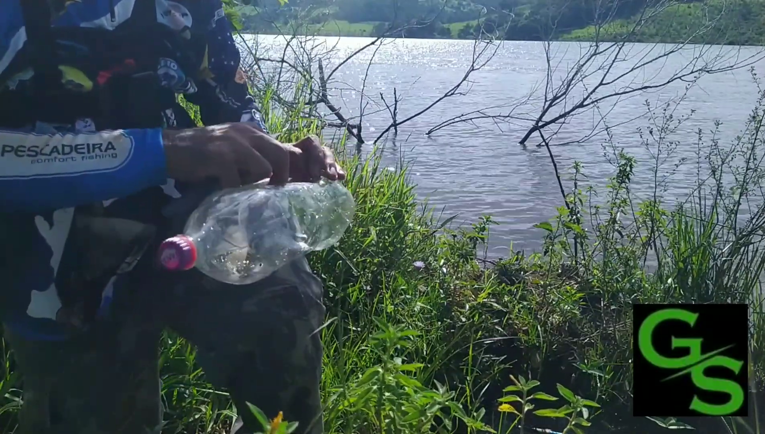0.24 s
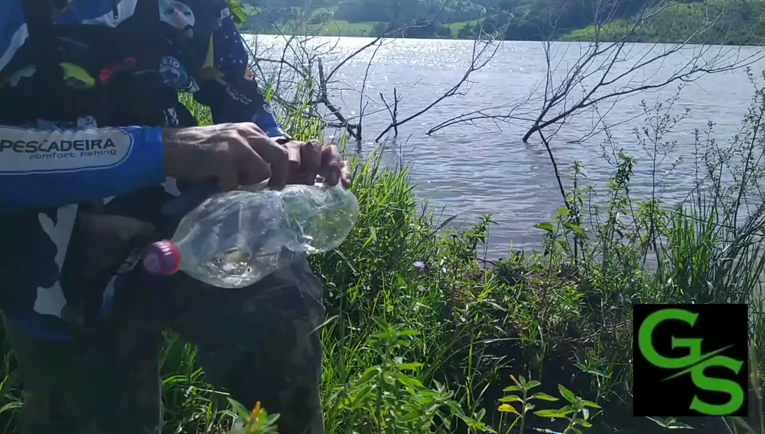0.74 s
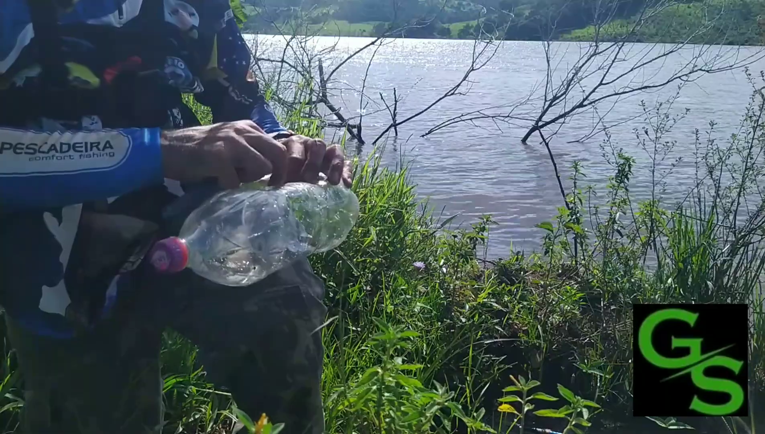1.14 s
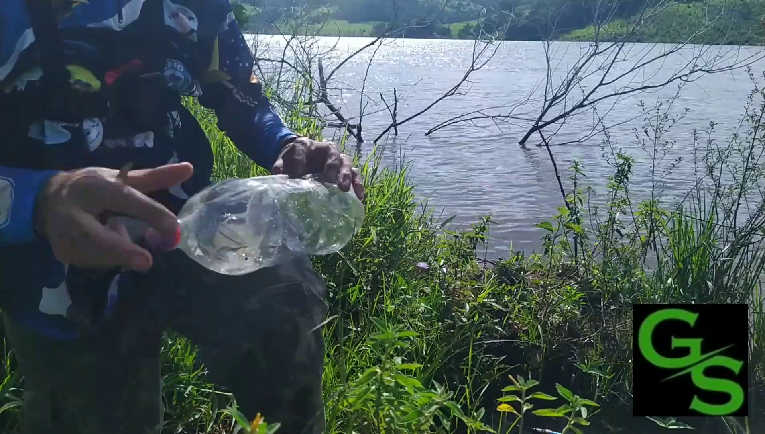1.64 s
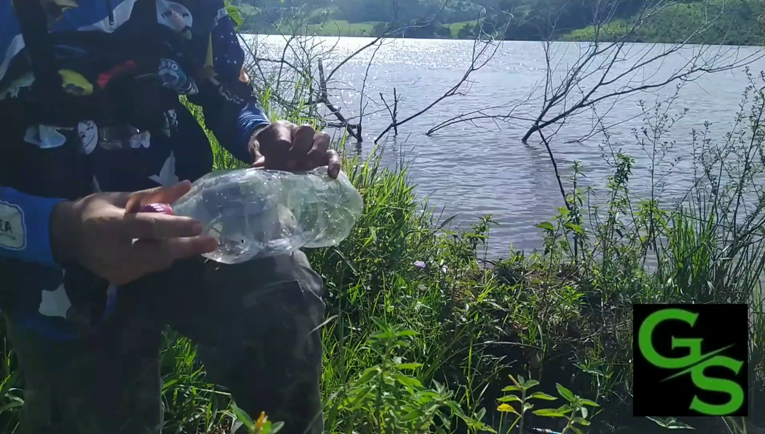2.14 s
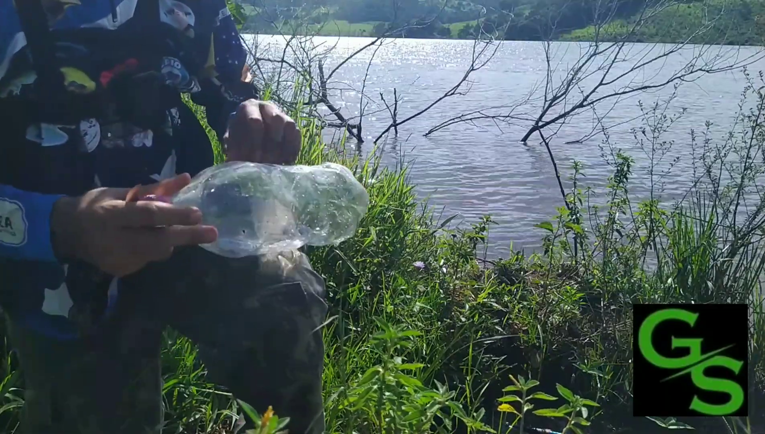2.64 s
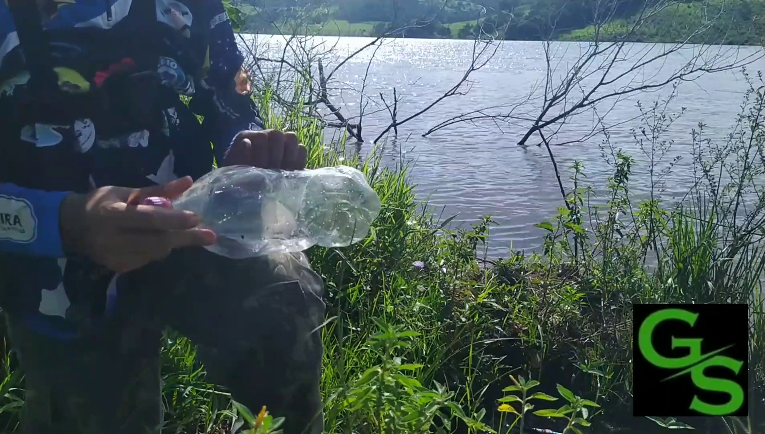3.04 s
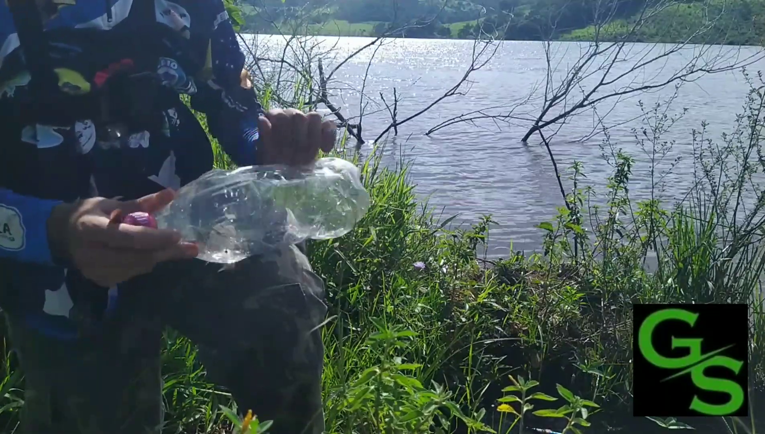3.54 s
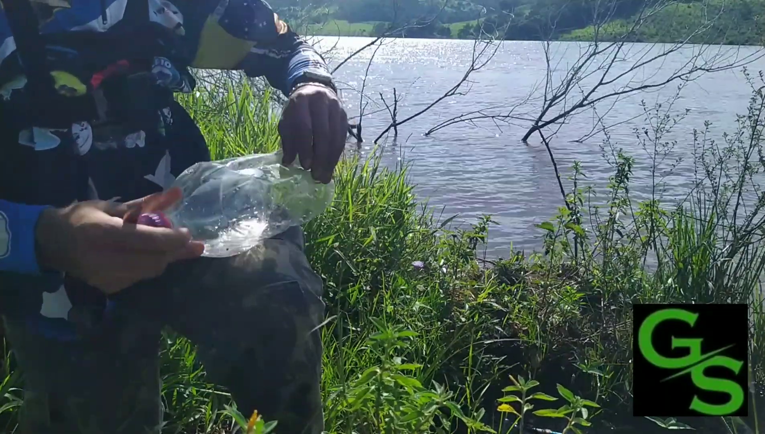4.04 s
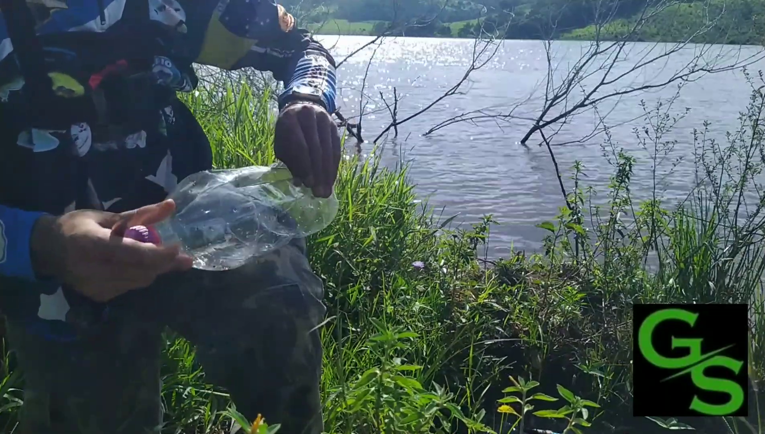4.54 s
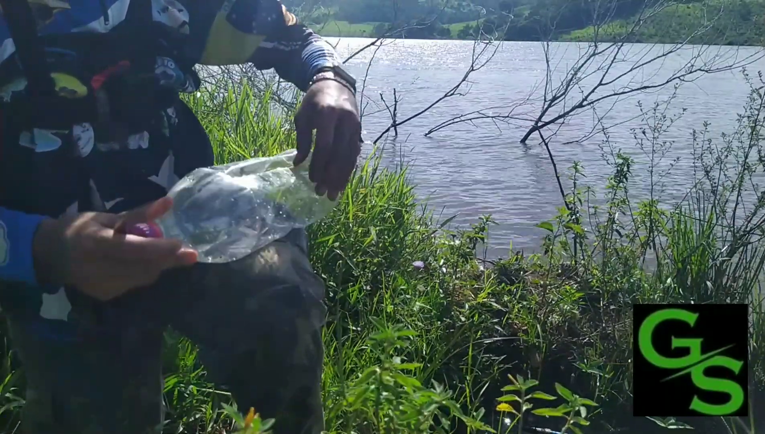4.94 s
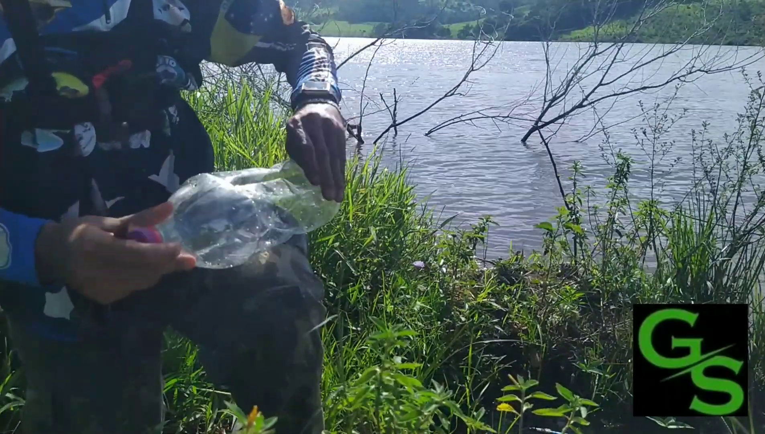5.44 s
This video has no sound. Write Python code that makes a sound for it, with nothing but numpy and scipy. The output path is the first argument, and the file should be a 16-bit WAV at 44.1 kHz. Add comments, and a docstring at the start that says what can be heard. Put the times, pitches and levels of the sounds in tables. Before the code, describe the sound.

A thin empty plastic bottle is squeezed and turned close to the microphone outdoors, very dry, in mono. Low wind rumble opens, with a heavy deep buffet at 0.2 s and a sharp plastic snap at 0.26; rumble swells again near 0.8, then fades. Weak hollow crackles and finger rubs cluster at 1.2-1.45 s, with a moderate click at 1.9. Loud short pops, each a bright crack with a hollow ring, follow as a close pair at 2.12-2.14, one at 2.72, and a tight burst at 2.97. Small creaks fill 3.2-3.65, and mild wind flutters at 3.6-4.2. A softer click at 4.26 precedes strong pops at 4.41, 4.91 and 5.34, with minor clicks between. Tiny bright ticks scatter at 5.45-5.67. Beneath are faint steady air, pulsing shrill insects around 7 kHz, and faint gliding bird whistles near 0.3 and 2.3 s.

```python
"""Beside a lake, hands squeeze and turn a thin plastic bottle; dents in its wall snap in and out.
Each snap sums damped modes of the wall and the enclosed air; sliding fingers drive the same modes with
uneven ticks, and tiny pitched ticks are short damped cycles. Wind buffets the microphone as shaped low
noise over a faint bed of air, insects shrill as narrow noise bands, and a far bird whistles gliding,
blurred sines. Weak scattered echoes surround the bottle."""
import sys
import numpy as np
from scipy import signal
from scipy.fft import rfft, irfft, next_fast_len
from scipy.io import wavfile
from scipy.ndimage import uniform_filter1d

SR = 44100
rng = np.random.default_rng(int(sys.argv[2]) if len(sys.argv) > 2 else 0)


def inscribe(sig):
    """Save sig as 16-bit PCM at rate SR to the path in sys.argv[1].

    A 1-D sig is mono; a 2-D sig holds one channel per row.
    Samples are clipped to [-1, 1] before scaling.
    """
    pcm = np.round(np.clip(np.atleast_2d(sig).T, -1, 1) * 32767)
    wavfile.write(sys.argv[1], SR, pcm.astype(np.int16))


N = 250488


def gain_of(db):
    """Level law: decibels become an amplitude ratio."""
    return 10 ** (np.asarray(db) / 20)


def evened(x):
    """Normalisation: scales a signal to rms 1."""
    return x / np.sqrt(np.mean(x ** 2) + 1e-20)


def slow_noise(shape, size):
    """Smoothing: noise averaged twice over size samples keeps only its slow variation, at rms 1."""
    noise = rng.standard_normal(shape)
    return evened(uniform_filter1d(uniform_filter1d(noise, size=size), size=size))


def read(points, hz):
    """Interpolation: a spectrum table is read on a log-frequency axis."""
    f, value = np.transpose(points)
    return np.interp(np.log(hz + 1), np.log(f + 1), value)


def coloured(x, points):
    """Linear filtering: the spectrum is multiplied by a table's gains, then brought to rms 1."""
    size = next_fast_len(len(x))
    gains = gain_of(read(points, np.fft.rfftfreq(size, 1 / SR)))
    return evened(irfft(rfft(x, size) * gains, size)[:len(x)])


def highpassed(x, order, hz):
    """High-pass filtering: a Butterworth filter removes what lies below hz."""
    return signal.sosfilt(signal.butter(order, hz, "high", fs=SR, output="sos"), x)


def add(mix, s, sound):
    """Superposition: a sound is summed into the mix from time s, cut at the end."""
    part = mix[round(s * SR):][:len(sound)]
    part += sound[:len(part)]


# Wind strength through time: time_s [s], level_db [dB]
GUST_LEVELS = [(0, -36.5), (.16, -35.5), (.27, -22.5), (.36, -38), (.42, -33.5), (.53, -56), (.62, -47.5),
               (.78, -30.5), (1.04, -59.5), (1.17, -42.5), (1.55, -59), (1.65, -46), (2.35, -52.5),
               (2.56, -47), (2.78, -50.5), (2.94, -45.5), (3.35, -57.5), (3.5, -51), (3.6, -36.5),
               (3.625, -42), (3.7, -35), (3.75, -49.5), (3.845, -31.5), (3.875, -40.5), (3.92, -35.5),
               (3.97, -53.5), (4.095, -61.5), (4.13, -44.5), (4.195, -36.5), (4.22, -47.5), (4.4, -58.5),
               (5.0, -60), (5.2, -51.5), (5.68, -52.5)]
# Spectrum of the pressure swings: frequency_hz [Hz], density_db [dB per Hz, relative]
WIND_SPECTRUM = [(12, -49), (20, -27.5), (42, -2), (65, 5), (129, -12.5), (196, -18.5), (275, -35.5),
                 (353, -34.5), (400, -46), (520, -67), (880, -120)]
SWELL_DB, LUMPS_DB = 1.6, 3.5  # rms of the random swells, and of the faster lumps above 110 Hz


def wind():
    """Turbulent pressure on the microphone port: low swings, whose stronger gusts reach higher."""
    time_s, level_db = np.transpose(GUST_LEVELS)
    gust_db = np.interp(np.arange(N) / SR, time_s, level_db) + SWELL_DB * slow_noise(N, 3000)
    swings = coloured(rng.standard_normal(N), WIND_SPECTRUM)
    upper = highpassed(swings, 2, 110)
    upper_db = 0.14 * (gust_db + 35.0) + LUMPS_DB * slow_noise(N, 700)
    return gain_of(gust_db) * (swings + (gain_of(upper_db) - 1) * upper)


# Spectrum of the steady air: frequency_hz [Hz], density_db [dB per Hz, relative]
AIR_SPECTRUM = [(59, -29.5), (100, -4.5), (256, -12.5), (357, -11), (933, -17), (1350, -22), (2720, -29),
                (5910, -27.5), (6980, -23.5), (8240, -42), (10700, -65.5), (18100, -120)]
AIR_DB = -61


def open_air():
    """Stationary random noise: a steady bed with a fixed spectrum."""
    return gain_of(AIR_DB) * coloured(rng.standard_normal(N), AIR_SPECTRUM)


def resonate(x, hz, width):
    """Heterodyne filtering: the pitch curve hz is shifted to zero, smoothed twice and shifted back."""
    turn, r = np.exp(2j * np.pi * np.cumsum(hz) / SR), np.exp(-np.pi * width / SR)
    smooth = signal.lfilter([1 - r], [1, -r], x / turn)
    smooth = signal.lfilter([1 - r], [1, -r], smooth)
    return (turn * smooth).real


PHRASE_EDGES = 0.55  # share of a phrase spent swelling and fading


def chorus(phrases, bands, drift):
    """Narrow-band noise: a fuzzy shrill swells, drifts in pitch and fades in each phrase."""
    out = np.zeros(N)
    for s, length, db in phrases:
        along = np.linspace(-.5, .5, round(length * SR))
        noise = rng.standard_normal(len(along))
        shrill = np.zeros(len(along))
        for hz, width, band_db in bands:
            band = resonate(noise, hz * (1 + drift * along), width)
            shrill += gain_of(band_db) * evened(band)
        envelope = signal.windows.tukey(len(along), PHRASE_EDGES)
        add(out, s, gain_of(db) * evened(shrill) * envelope)
    return out


# Phrases of the high chorus: start_s [s], length_s [s], level_db [dB]
HIGH_CHORUS_PHRASES = [(0, 0.26, -73.5), (.38, 0.47, -70.5), (1.08, 0.44, -69), (1.62, 0.61, -72),
                       (2.24, 0.52, -72.5), (2.8, 0.69, -75.5), (3.12, 0.7, -73.5), (3.75, 0.5, -71),
                       (4.4, 0.75, -72), (5.14, 0.41, -70.5)]
# Bands of the high chorus: pitch_hz [Hz], width of each smoothing_hz [Hz], level_db [dB, relative]
HIGH_CHORUS_BANDS = [(7044, 490, 1.5), (6700, 250, -4), (7016, 78, -6)]
# Phrases of lone insects: start_s [s], length_s [s], level_db [dB], first_pitch_hz [Hz],
# last_pitch_hz [Hz], width of each smoothing_hz [Hz]
LONE_PHRASES = [(.42, .48, -77, 5320, 5140, 200), (.34, .5, -77, 4550, 4330, 420),
                (2.28, .66, -79, 5200, 5290, 200), (4.66, .45, -76, 5200, 5260, 200),
                (4.58, .52, -73, 4330, 4540, 420)]
HIGH_DRIFT = .03  # share by which the pitch climbs over a phrase


def insects():
    """Band-limited stridulation: a high chorus of several bands and lone insects of one band each."""
    out = chorus(HIGH_CHORUS_PHRASES, HIGH_CHORUS_BANDS, HIGH_DRIFT)
    for s, length, db, first, last, width in LONE_PHRASES:
        middle = (first + last) / 2
        out += chorus([(s, length, db)], [(middle, width, 0)], (last - first) / middle)
    return out


# Bird calls, one pair a call: blur_rad [radians], then rows of
# time_s [s], pitch_hz [Hz], level_db [dB]
BIRD_CALLS = [(.3, [(0, 4200, -56), (.025, 4650, -69), (.055, 4850, -65.5), (.1, 4550, -68),
              (.185, 3650, -84)]), (1.6, [(2.245, 4500, -67), (2.28, 4770, -66.5), (2.38, 4430, -71)])]


def whistle(blur, rows):
    """Frequency modulation: a gliding near-sine flutters and blurs on its way over the water."""
    s, *columns = np.transpose(rows)
    t = np.arange(s[0], s[-1], 1 / SR)
    hz, db = (uniform_filter1d(np.interp(t, s, c), size=600) for c in columns)
    flutter = evened(uniform_filter1d(rng.standard_normal((2, len(t))), size=150))
    tone = np.sin(2 * np.pi * np.cumsum(hz) / SR + blur * flutter[1])
    return s[0], gain_of(db + 2.5 * flutter[0]) * tone * signal.windows.tukey(len(t), .2)


TICK_S = .0006  # time at which a tick's envelope peaks


def tick(db, hz):
    """Impulsive damping: a few quickly damped cycles with a rough edge."""
    t = np.arange(300) / SR
    rough = np.sin(2 * np.pi * hz * t) + 0.31 * rng.standard_normal(len(t))
    return gain_of(db) * rough * (t / TICK_S) * np.exp(1 - t / TICK_S)


# The clearest tiny pitched ticks: start_s [s], level_db [dB], pitch_hz [Hz]
CLEAR_TICKS = [(0.676, -56, 4870), (.712, -54, 4660), (.994, -55, 5300), (2.619, -51.5, 3230),
               (4.314, -55, 2020), (4.334, -49.5, 2730), (4.349, -55.5, 3630), (4.558, -43.5, 7420),
               (4.563, -44, 4760), (4.7, -52.5, 4550), (5.536, -52, 4200), (5.563, -44, 5000),
               (5.562, -45.5, 6860), (5.586, -46, 3640), (5.629, -48, 3130), (5.666, -49.5, 1880)]
SCATTER_S, SCATTER_DB = (5.43, 5.67), -57  # span, and lowest level of the scatter near the end
STRAY_DB = -60.5  # lowest level of the faint ticks all along


def peeling():
    """Random point process: clear ticks, a fainter scatter near the end, and strays all along."""
    out, (start, end) = np.zeros(N), SCATTER_S
    for s, db, hz in CLEAR_TICKS:
        add(out, s, tick(db, hz))
    for when, size, pitch in rng.random((24, 3)):
        add(out, start + when * (end - start), tick(SCATTER_DB + 4.6 * size, 1500 + 6000 * pitch))
    for when, size, pitch in rng.random((40, 3)):
        add(out, when * N / SR, tick(STRAY_DB + 4.3 * size, 1500 + 5000 * pitch))
    return out


# Sudden buffets: start_s [s], level_db [dB], pitch_hz [Hz], decay_s [s, to 1/e]
BUFFETS = [(0.2182, -8.5, 81, 0.014), (3.835, -39.5, 190, 0.015)]
KNOCK_RISE_S = 0.0015


def knock(db, hz, decay):
    """Damped oscillation: one low swing dies away exponentially."""
    t = np.arange(3000) / SR
    envelope = np.exp(-t / decay) * (1 - np.exp(-t / KNOCK_RISE_S))
    return -gain_of(db) * np.sin(2 * np.pi * hz * t) * envelope


# Free decay of the wall modes: frequency_hz [Hz], t60_s [s]
WALL_DECAY = [(300, 0.09), (660, 0.065), (1740, 0.043), (4590, 0.04), (8000, 0.028)]
# Dents snapping: start_s [s], level_db [dB], air_hz [Hz], loudest wall patch_hz [Hz],
# hollow_db [dB, low wall and air], treble_db [dB], damping [share of the free ring time]
DENT_SNAPS = [(0.258, -11.5, 507, 1863, 1.5, -8, 0.57), (0.315, -42.5, 300, 1320, 21, -39, 0.41),
              (0.418, -35, 325, 1040, 31.5, -44, 0.19), (1.208, -46.5, 368, 1230, 11, -27, 0.44),
              (1.264, -43, 326, 1340, 16.5, -8, 0.49), (1.303, -33, 458, 944, 9, -10, 0.41),
              (1.367, -32, 305, 1410, 13, -17, 0.43), (1.383, -36.5, 385.5, 910, 13, -2, 0.93),
              (1.407, -39, 350.6, 1063, 16, -25, 1), (1.668, -51, 344, 1080, 8.5, -13, 0.67),
              (1.813, -37.5, 435, 1570, 0.5, -2, 0.43), (1.862, -43, 304, 1020, 10, -4, 0.55),
              (1.885, -23, 382, 1120, -0.5, -27, 0.62), (1.938, -44, 307, 960, 14, -9, 0.75),
              (2.118, -13.5, 414.4, 1370, 1.5, -10.5, 0.8), (2.141, -10, 360, 1580, 0, -13, 0.69),
              (2.46, -30.5, 326, 1170, 9.5, -23, 0.18), (2.505, -43, 325, 1220, 7, -20, 0.51),
              (2.565, -28, 309, 1520, -2.5, -19.5, 1.0), (2.582, -42, 462, 1750, 10, -6, 0.48),
              (2.723, -7.5, 360, 1346, -2.5, -12, 0.83), (2.97, -25, 366, 1220, 15.5, -12, 0.84),
              (2.979, -14, 464, 1296, 11.5, -3.5, 0.39), (2.984, -7.5, 320, 1046, 5, -16.5, 0.51),
              (3.222, -32.5, 299, 890, 13, -25, 0.29), (3.274, -40, 320, 2140, -1.5, -7.5, 0.64),
              (3.435, -37, 290, 1170, 9.5, -12.5, 0.63), (3.46, -41, 300, 870, 32, -26, 0.17),
              (3.646, -43.5, 335, 890, 3.5, -15.5, 0.73), (4.257, -23.5, 453, 1390, -6.5, -4, 0.55),
              (4.412, -7, 308.5, 1518, 0, -9.5, 0.81), (4.462, -42, 307, 1150, 5.5, -10.5, 0.33),
              (4.778, -29, 380, 922, -1.5, -2.5, 0.39), (4.828, -36.5, 357, 1160, 11.5, -24, 0.51),
              (4.907, -9.5, 407, 1360, -4, -10, 0.67), (5.156, -51, 326, 1740, 7, 1, 1.0),
              (5.187, -29.5, 323, 1040, 0.5, -71, 0.41), (5.336, -10, 364.3, 1114, -3, -18, 0.72)]
# t60 values are free ring times [s]; levels of air and overtone are against the low wall modes
PATCH_DB, PATCH_T60 = -2.5, 0.04
AIR_RING_DB, AIR_T60 = -9, 0.15
OVERTONE_HZ, OVERTONE_DB, OVERTONE_T60 = 725.3, -10.5, 0.061  # second ring of the enclosed air
THUMP_HZ, THUMP_DB, THUMP_T60 = 170, -26, 0.095  # the whole bottle jolts; level against the snap
LOW_WALL_DB = 2.5  # added to the hollowness for wall modes under the overtone
WAVER = .3  # rms wavering of the air ring as the wall settles: radians, and share of its amplitude


def snap(db, air_hz, patch_hz, hollow_db, treble_db, damping):
    """Modal synthesis: a flipping dent rings many wall modes, a louder patch and the enclosed air."""
    t = np.arange(4000) / SR

    def ring(hz, t60, rise_cycles):
        """Modal decay: 60 dB over the damped t60, after a rise timed in cycles, so bass swells later."""
        return np.exp(-np.log(1000) * t / (t60 * damping)) * (1 - np.exp(-t * hz / rise_cycles))

    def sine(hz, shift=0):
        """Simple harmonic motion, its phase shift given in radians."""
        return np.sin(2 * np.pi * hz * t + shift)

    place, phase, size = rng.random((70, 3)).T
    hz = (290 + (np.arange(len(place)) + place) * 118)[:, None]
    low_db = hollow_db + LOW_WALL_DB
    colour = [(250, low_db), (700, low_db), (1200, 0.54), (2200, 0.083 * treble_db),
              (3500, treble_db + 7.0), (8500, treble_db)]
    mode_db = read(colour, hz) + 8.6 * (size[:, None] - .5)
    modes = gain_of(mode_db) * ring(hz, read(WALL_DECAY, hz), 0.8)
    wall = (modes * sine(hz, 2 * np.pi * phase[:, None])).sum(0) / 6
    patch = gain_of(PATCH_DB) * ring(patch_hz, PATCH_T60, 0.71) * sine(patch_hz)

    waver = WAVER * slow_noise((2, len(t)), 300)
    air = gain_of(hollow_db + AIR_RING_DB) * ring(air_hz, AIR_T60, 0.95)
    air *= sine(air_hz, waver[0]) * (1 + waver[1])
    overtone = gain_of(hollow_db + OVERTONE_DB) * ring(OVERTONE_HZ, OVERTONE_T60, 2.5)
    overtone *= sine(OVERTONE_HZ, 2 * np.pi * phase[0])
    thump = gain_of(THUMP_DB) * ring(THUMP_HZ, THUMP_T60, 0.95) * sine(THUMP_HZ)

    onset_s = 0.00038 * gain_of(-.4 * (db + 7.0))  # weak dents roll over more slowly
    return gain_of(db) * (1 - np.exp(-t / onset_s)) * (wall + patch + air + overtone + thump)


CRUMPLE_S, CRUMPLE_DB = .007, -34  # time of the slips; dents weaker than this level slip most


def crumpled(sound, db):
    """Convolution with an impulse train: a weak dent lets go in a ragged handful of slips."""
    when, size = rng.random((6, 2)).T
    slips = np.zeros(round(CRUMPLE_S * SR) + 1)
    slips[(when * CRUMPLE_S * SR).astype(int)] = (2 * size - 1) / (1 + gain_of(db - CRUMPLE_DB))
    slips[0] = 1
    return np.convolve(sound, slips / np.linalg.norm(slips))


# Finger strokes on the wall: start_s [s], length_s [s], level_db [dB],
# brightness_db [dB, gain of the treble]
FINGER_STROKES = [(0.262, 0.07, -40, 4.5), (1.286, 0.1, -47, 0), (1.367, 0.033, -35.5, 1),
                  (1.392, 0.052, -38, 0), (1.883, 0.05, -47.5, 4), (1.924, 0.068, -46.5, 1),
                  (2.546, 0.074, -39, 2), (2.897, 0.19, -52, -6), (3.423, 0.093, -47, -4),
                  (3.497, 0.077, -45, -0.5), (3.778, 0.21, -53, 9), (4.026, 0.17, -50, 3.5),
                  (4.738, 0.047, -57, 3), (4.771, 0.1, -48, 2), (4.966, 0.29, -60.5, 3)]
# Filter that colours the rubbing: frequency_hz [Hz], gain_db [dB]
RUB_FILTER = [(150, 3.5), (260, 0), (350, -5), (480, -3.5), (1000, -4), (2000, -5), (4000, -19), (8000, -8)]


def rubbing():
    """Stick-slip friction: clumps of uneven ticks over hiss set the wall and enclosed air ringing."""
    clumps = gain_of(2.8 * evened(uniform_filter1d(rng.standard_normal(N), size=220)))
    sizes = gain_of(4.2 * np.minimum(rng.exponential(1, N), 3))
    slips = rng.random(N) < 1200 / SR  # about 1200 a second
    ticks = sizes * slips * rng.standard_normal(N)
    drive = clumps * (evened(ticks) + 0.29 * rng.standard_normal(N))
    body = snap(0, 350, 1500, 10.8, -7, damping=0.17)
    wall = coloured(signal.oaconvolve(drive, body)[:N], RUB_FILTER)
    treble = highpassed(wall, 2, 1800)
    out = np.zeros(N)
    for s, length, db, bright_db in FINGER_STROKES:
        span = slice(round(s * SR), round((s + length) * SR))
        sound = (wall[span] + (gain_of(bright_db) - 1) * treble[span]) / np.std(wall[span])
        fading = gain_of(np.linspace(3.5, -6, len(sound)))
        add(out, s, gain_of(db) * sound * signal.windows.tukey(len(sound), .8) * fading)
    return out


ECHO_DB, ECHO_T60 = -10.5, 0.087  # level against the direct sound; decay time in s


def surroundings(x):
    """Diffuse reflection: weak echoes from ground, knees and plants; small things return mostly treble."""
    t = np.arange(6000) / SR
    scatter = signal.lfilter([1, -.8], 1, rng.standard_normal(len(t)))
    tail = scatter * gain_of(-60 * t / ECHO_T60) * (1 - np.exp(-t / 0.004))
    return x + gain_of(ECHO_DB) * signal.oaconvolve(x, tail / np.linalg.norm(tail))[:N]


def scene():
    """Superposition: open-air sounds reach the mix directly, bottle sounds with their echoes."""
    mix = wind() + open_air() + insects()
    for call in BIRD_CALLS:
        add(mix, *whistle(*call))
    for s, *row in BUFFETS:
        add(mix, s, knock(*row))
    bottle = peeling() + rubbing()
    for s, db, *row in DENT_SNAPS:
        add(bottle, s, crumpled(snap(db, *row), db))
    return (mix + surroundings(bottle))[None]


EDGE_HZ, TOP_HZ = 8050, 11600  # edges of the narrow band and of the final band limit
IMAGE_HZ, LEAK_DB = 16000, -32.5  # carrier and gain of the mirror image
HISS_DB = -99


def record(dry):
    """Aliasing: after a bass cut, a slow converter adds a faint mirror image; band limit and hiss follow."""
    dry = highpassed(dry, 3, 42)
    narrow_filter = signal.firwin(161, EDGE_HZ, window=("kaiser", 8), fs=SR)[None]
    narrow = signal.oaconvolve(dry, narrow_filter, "same")
    mirrored = narrow * np.cos(2 * np.pi * IMAGE_HZ * np.arange(N) / SR)
    leaky = narrow + gain_of(LEAK_DB) * mirrored
    top_filter = signal.firwin(511, TOP_HZ, window=("kaiser", 11), fs=SR)[None]
    limited = signal.oaconvolve(leaky, top_filter, "same")
    return limited + gain_of(HISS_DB) * rng.standard_normal(dry.shape)


dry = scene()
out = record(dry)
inscribe(out)
```